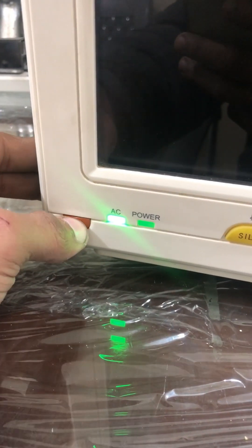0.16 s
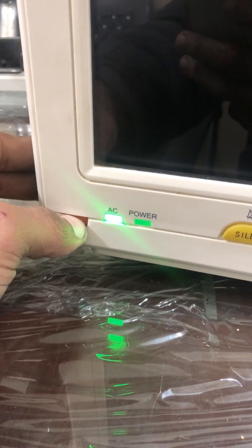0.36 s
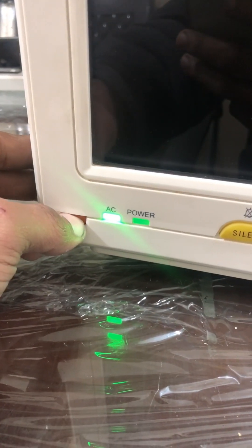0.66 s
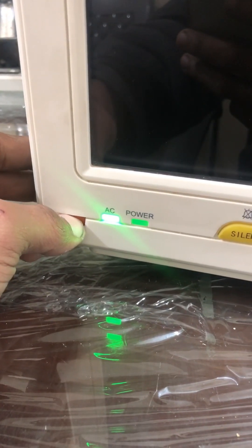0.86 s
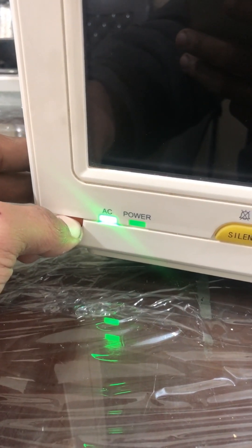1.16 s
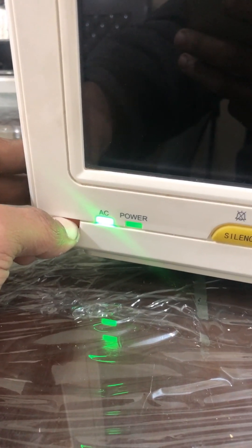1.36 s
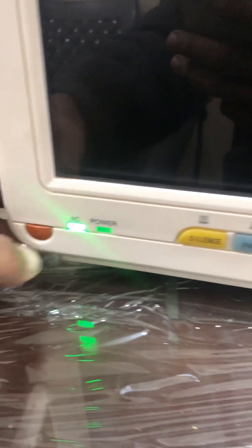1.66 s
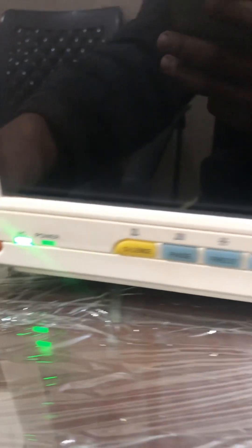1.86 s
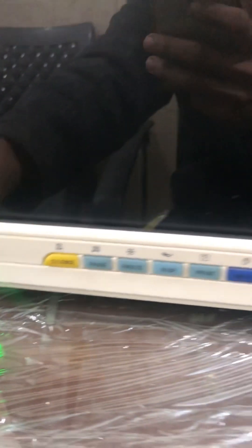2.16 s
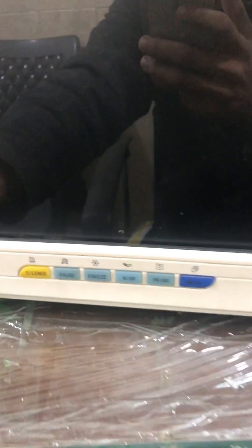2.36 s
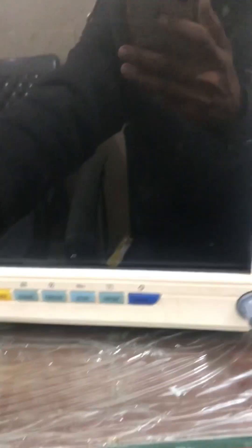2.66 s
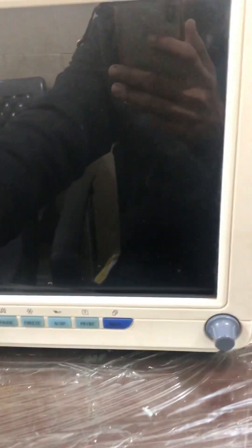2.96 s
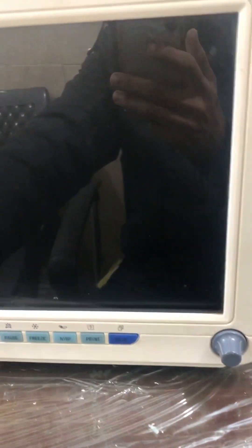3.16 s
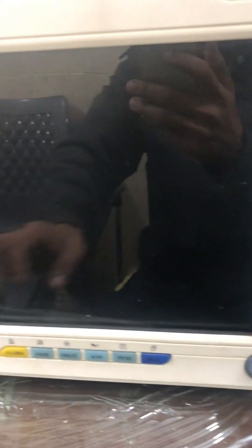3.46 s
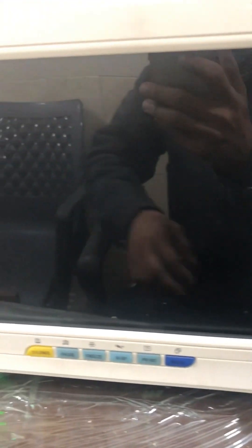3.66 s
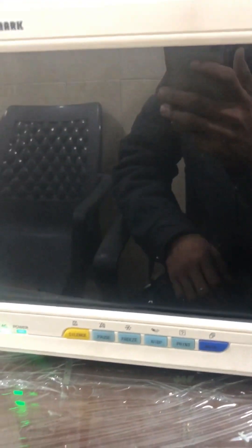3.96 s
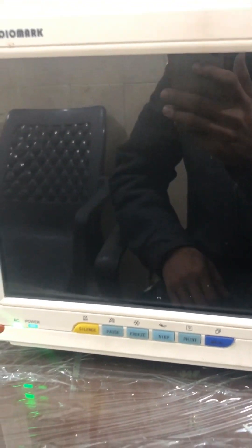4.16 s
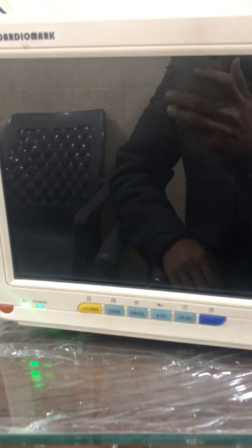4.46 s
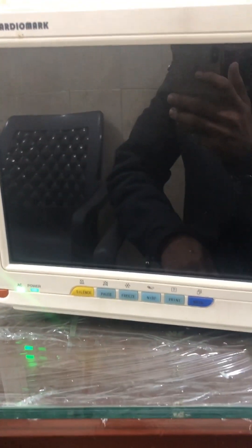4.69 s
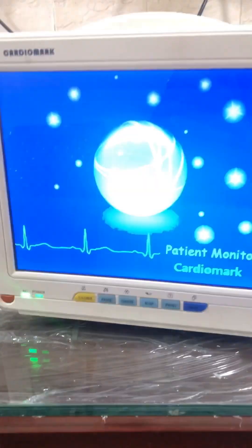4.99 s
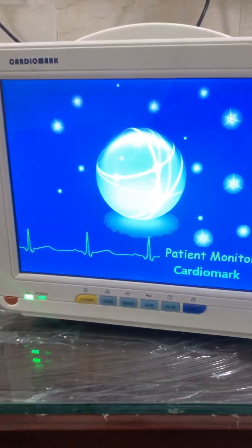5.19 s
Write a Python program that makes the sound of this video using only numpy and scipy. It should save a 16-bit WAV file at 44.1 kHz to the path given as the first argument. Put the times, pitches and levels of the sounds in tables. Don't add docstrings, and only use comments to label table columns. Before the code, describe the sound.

Close handling of a plastic device: clicks, soft rustling, hollow chair knocks, two bright clacks and an arm thudding on a film-covered desk.

```python
import sys
import numpy as np
from scipy import signal
from scipy.fft import rfft, irfft
from scipy.io import wavfile
from scipy.ndimage import uniform_filter1d

SR = 44100
rng = np.random.default_rng(int(sys.argv[2]) if len(sys.argv) > 2 else 0)


def output_pcm(signal):
    pcm = np.clip(np.atleast_2d(signal).T, -1, 1) * 32767
    wavfile.write(sys.argv[1], SR, np.round(pcm).astype(np.int16))


def level_to_linear(level):
    exponent = np.asarray(level, float) / 20
    return 10 ** exponent


N = 235097


def rms_one(x):
    return x / np.sqrt(np.mean(x ** 2) + 1e-20)


def at_hz(points, hz):
    table = np.array(points)
    return np.interp(np.log(hz), np.log(table[:, 0]), table[:, 1])


def add(out, s, sound):
    at = round(s * SR)
    out[at:at + len(sound)] += sound[:N - at]


def drift(rate):
    r = np.exp(-80 * np.pi * rate / SR)
    white = rng.standard_normal(N // 40 + 2002)
    slow = signal.lfilter([1], [1, -2 * r, r * r], white)[2000:]
    return np.interp(np.arange(N) / 40, np.arange(len(slow)), rms_one(slow))


def ring(force, hz, t60):
    r = level_to_linear(-60 / (max(t60, .003) * SR))
    w = 2 * np.pi * hz / SR
    return signal.lfilter([0, np.sin(w)], [1, -2 * r * np.cos(w), r * r], force + 1e-18)


def modes(force, table):
    return sum((-1) ** k * level_to_linear(db) * ring(force, hz, t60) for k, (hz, db, t60) in enumerate(table))


def push(ms, size=22050):
    width = np.arange(size) / SR / (max(ms, .05) / 1000)
    force = np.sin(np.pi * np.minimum(width, 1))
    return force / force.sum()


def swell(force, hz, t60):
    twice = ring(ring(force, hz, t60), hz, t60)
    return twice / np.abs(twice).max()


def coloured(spectrum, size):
    hz = np.maximum(np.fft.rfftfreq(size, 1 / SR), 1)
    outside = (hz < spectrum[0][0]) | (hz > spectrum[-1][0])
    gain = level_to_linear(at_hz(spectrum, hz) - 30 * outside)
    return rms_one(irfft(rfft(rng.standard_normal(size)) * gain, size))


def burst(spectrum, t60, rise_ms, size=22050):
    t = np.arange(size) / SR
    rise = np.minimum(t * 1000 / max(rise_ms, .05), 1)
    return coloured(spectrum, size) * level_to_linear(-60 * t / max(t60, .003)) * rise


def bells(still_db, s, half_s, peak_db):
    t = np.arange(0, N + 64, 64) / SR
    away = (t - s[:, None]) / np.maximum(half_s, .01)[:, None]
    swells = level_to_linear(peak_db[:, None] - 6 * away ** 2)
    power = level_to_linear(still_db) ** 2 + np.sum(swells ** 2, axis=0)
    return np.interp(np.arange(N) / 64, np.arange(len(power)), 10 * np.log10(power))


def radiate(x, low_hz):
    return signal.sosfilt(signal.butter(2, low_hz, "high", fs=SR, output="sos"), x)


# (f/Hz, t60/s)
ROOM_T60 = [(100, 1), (500, 0.33), (2000, 0.42), (6000, 0.32), (12000, 0.24)]


def room(x, size=32768):
    t = np.arange(size) / SR
    tail = 0
    edges = 80 * 2 ** np.arange(0, 8.1, .5)
    for low, high in zip(edges, edges[1:]):
        half_octave = signal.butter(2, [low, high], "band", fs=SR, output="sos")
        band = signal.sosfilt(half_octave, rng.standard_normal(size))
        tail = tail + band * level_to_linear(-60 * t / at_hz(ROOM_T60, np.sqrt(low * high)))
    tail = tail * np.clip((t - .003) / 0.00067, 0, 1)
    return signal.fftconvolve(x, tail / np.sqrt(np.sum(tail ** 2)))[:N]


# (f/Hz, level/dB per Hz)
RUMBLE_SHAPE = [(15, -32), (25, -43), (39, -19), (54, -12), (70, 4.5), (86, -6), (118, -1.5), (145, -7),
                (166, -6.5), (220, -2), (290, -38), (480, -120)]
# (f/Hz, level/dB re rumble, t60/s)
HUM = [(60, -3, .5), (119, -4, .4)]
RUMBLE_DB, RUMBLE_WANDER_DB = -65, 3.5


def rumble():
    level_db = RUMBLE_DB + RUMBLE_WANDER_DB * drift(7.5)
    white = rng.standard_normal(N)
    hum = sum(level_to_linear(db) * rms_one(ring(white, hz, t60)) for hz, db, t60 in HUM)
    return level_to_linear(level_db - 7) * (level_to_linear(-2.0) * coloured(RUMBLE_SHAPE, N) + hum)


# (t/s, half length/s, level/dB)
BOOMS = [
    (0.958, 0.08, -65.5),
    (1.615, 0.038, -59),
    (2.067, 0.054, -64),
    (2.395, 0.03, -73),
    (2.765, 0.053, -70),
    (3.795, 0.061, -49.5),
    (3.985, 0.077, -54),
    (4.212, 0.12, -72),
    (5.19, 0.048, -61),
]
# (f/Hz, level/dB per Hz)
BOOM_SHAPE = [(60, -12), (95, -5.5), (118, -3), (200, -10.5), (290, -22)]


def booms():
    return level_to_linear(bells(-86, *np.transpose(BOOMS))) * coloured(BOOM_SHAPE, N)


# (t/s of fastest motion, half length/s, swish level/dB, weight/dB, speed/dB)
STROKES = [(0.055, 0.069, -70, -0.5, -9.5), (1.662, 0.21, -77.5, 6.5, -6), (2.066, 0.29, -70.5, 4.5, -3),
           (2.415, 0.15, -70.5, 6, -2.5), (2.566, 0.083, -52, -6, -10), (2.77, 0.049, -61.5, 5.5, -9),
           (3.033, 0.37, -71.5, 4, -5.5), (3.375, 0.047, -72.5, -10, 6), (3.442, 0.19, -65, 4.5, -4),
           (3.657, 0.28, -66, 1.5, -19), (3.87, 0.14, -57.5, 0.5, -2), (4.13, 0.11, -58.5, -6, -1),
           (4.37, 0.26, -67, 9, 0), (4.62, 0.1, -64, 6, -7.5), (4.756, .08, -78, 12, -38.5),
           (4.98, 0.21, -68, 6, 0), (5.272, 0.21, -70.5, -1, -20)]
STILL_DRAG_DB, STILL_SWISH_DB, STILL_SHEEN_DB = -72, -79.5, -79


def motion():
    s, half_s, db, weight_db, speed_db = np.transpose(STROKES)
    return (bells(STILL_DRAG_DB, s, half_s, db + weight_db),
            bells(STILL_SWISH_DB, s, half_s, db),
            bells(STILL_SHEEN_DB, s, half_s, db + speed_db))


# (f/Hz, level/dB per Hz)
DRAG = [(120, -6.5), (200, 0.5), (400, 2.5), (800, -2), (1500, -9), (2500, -20.5)]
SWISH = [(800, -4), (1500, -1.5), (2500, 1), (4000, 0.5), (6000, -7), (9000, -24)]
SHEEN = [(3500, -3.5), (6000, 3.5), (9000, 2.5), (12000, 0.5), (14800, -3.5), (15500, -5), (15850, -40)]


def rustle(patchy_db):
    together = drift(22.6)
    out = np.zeros(N)
    for level_db, shape in zip(motion(), (DRAG, SWISH, SHEEN)):
        flicker_db = patchy_db * (together + 1.2 * drift(37))
        out += level_to_linear(level_db + flicker_db) * coloured(shape, N)
    return out


SNAP_FROM_DB, SNAPS_PER_S_PER_DB, SNAPS_MAX_PER_S = -70.5, 34.5, 260
SNAP_DB, SNAP_FOLLOWS = -62.5, 0.16


def crackle():
    swish_db = motion()[1]
    per_s = np.minimum(SNAPS_PER_S_PER_DB * (swish_db - SNAP_FROM_DB), SNAPS_MAX_PER_S)
    level_db = SNAP_DB + SNAP_FOLLOWS * (swish_db - SNAP_DB)
    size_db = 4.5 * np.minimum(rng.exponential(1, N), 3)
    snaps = (rng.random(N) < per_s / SR) * level_to_linear(size_db) * rng.choice([-1, 1], N)
    film = [(1130, -3.0, 0.009), (1770, -6.5, 0.0061), (3280, -10.0, 0.019), (5070, -22.5, 0.0038)]
    return level_to_linear(level_db) * modes(snaps, film)


# (t/s, level/dB)
CREASES = [
    (2.415, -50),
    (2.444, -55),
    (2.48, -49.5),
    (2.498, -49),
]
CREASE_FROM_HZ, CREASE_TO_HZ, CREASE_S = 2900, 485, 0.00653


def creases():
    out = np.zeros(N)
    part = np.linspace(0, 1, round(CREASE_S * SR))
    hz = CREASE_FROM_HZ * (CREASE_TO_HZ / CREASE_FROM_HZ) ** part
    chirp = np.sqrt(np.sin(np.pi * part) + 1e-12) * np.sin(2 * np.pi * np.cumsum(hz) / SR)
    for s, level_db in CREASES:
        add(out, s, level_to_linear(level_db) * chirp)
    return out


# (t/s, length/s, start f/Hz, end f/Hz, level/dB)
SQUEAKS = [
    (4.14, .075, 13300, 13950, -71),
    (4.215, .07, 13550, 13750, -73),
    (4.29, .04, 12150, 12000, -73),
    (4.34, .04, 14100, 13450, -70),
    (4.365, .03, 15300, 15400, -73),
    (4.41, .06, 12050, 12250, -71),
    (4.44, .035, 13950, 13600, -72),
    (4.48, .025, 14600, 14700, -74),
]


def squeaks():
    out = np.zeros(N)
    for s, length, start_hz, end_hz, level_db in SQUEAKS:
        size = round(length * SR)
        waver = 1500 * uniform_filter1d(rng.standard_normal(size), size=200)
        phase = 2 * np.pi * np.cumsum(np.linspace(start_hz, end_hz, size) + waver) / SR
        add(out, s, level_to_linear(level_db + 2.5) * np.sqrt(np.hanning(size)) * np.sin(phase))
    return out


# (f/Hz, level/dB, t60/s)
DRAGGED = [(4690, -1, .022), (5480, -4, .012), (5800, -5, .012), (8000, -4, .012), (9800, -4, .01),
           (10800, -5, .01), (11900, -5, .01), (13600, -6, .01), (14300, -7, .01)]
SLIDE_S, SLIDE_ATTACK_S, SLIDE_DB, SLIDE_STUTTER_DB = 4.8, 0.049, -71.5, -0.5


def slide():
    moving = np.clip((np.arange(N) / SR - SLIDE_S) / SLIDE_ATTACK_S, 0, 1)
    singing = rms_one(modes(rng.standard_normal(N), DRAGGED))
    return moving * singing * level_to_linear(SLIDE_DB + SLIDE_STUTTER_DB * drift(22.0))


# (t/s, peak level/dB, f/Hz, edge level/dB re peak, t60/s)
KNOCKS = [
    (2.026, -34, 415, -18, 0.026),
    (2.043, -56.5, 453, 0.5, 0.05),
    (2.087, -29.5, 434, -24, 0.034),
    (2.144, -45.5, 415, -22, 0.041),
    (4.601, -40.5, 414, -34, 0.032),
    (4.643, -50, 483, -10, 0.024),
    (4.71, -54.5, 343, -8.5, 0.017),
    (4.736, -49.5, 258, -13, 0.06),
]


def knocks():
    out = np.zeros(N)
    for s, peak_db, hz, edge_db, t60 in KNOCKS:
        air = .8 * swell(push(.6), hz, t60)
        wall = [(.88 * hz, -14, .12), (1.14 * hz, -12, .12), (.47 * hz, -16, .1), (2.2 * hz, -14, .05)]
        walls = modes(push(2.4), wall)
        blur = [(170, 3.5), (330, -7.5), (430, -2.5), (560, -1), (800, -70)]
        rough = level_to_linear(-12.0) * burst(blur, 0.25, rise_ms=17.0)
        edge = level_to_linear(edge_db - 0.5) * burst([(600, 15.0), (2500, 0.5), (5000, -18)], 0.23, rise_ms=2.9)
        add(out, s - .001, level_to_linear(peak_db) * (air + walls + rough + edge))
    return out


# (t/s, f/Hz, level/dB, t60/s)
PINGS = [
    (1.586, 2215, -48, .13),
    (3.706, 5090, -37, .035),
    (3.706, 5140, -53, .35),
    (3.706, 7400, -45, .055),
    (3.706, 9550, -43, .07),
    (3.706, 11500, -42, .04),
    (3.93, 2150, -55, .08),
]


def spring():
    out = np.zeros(N)
    for s, hz, level_db, t60 in PINGS:
        add(out, s, level_to_linear(level_db) * ring(push(.1), hz, t60))
    return out


# (t/s, peak level/dB, rattle t60/s, body level/dB re peak, buzz level/dB re peak)
CLACKS = [
    (2.7303, -20.5, 0.035, -15.5, -21.5),
    (5.1508, -22.5, 0.069, -11, -17.5),
]
# (f/Hz, level/dB, t60/s)
BODY = [(275, -12, .2), (460, -20, .15), (640, -11, .09), (730, -12, .08), (856, -3, .105), (1125, -9, .14),
        (1950, -18, .12)]
SHELL = [(3400, -14, .15), (4690, -7, .12), (5250, -7, .1), (5462, -2, .16), (5660, -7, .14),
         (5840, -5, .12), (8750, -12, .1), (9900, -8, .1), (10420, -6, .12), (10800, -6, .12),
         (11265, -3, .14), (11960, -5, .13), (12480, -7, .12), (13275, -10, .12)]
# (f/Hz, level/dB per Hz)
CRACK = [(710, -36), (1200, 3.5), (1370, -10), (1880, -3.5), (2970, -17.5), (3320, -6), (4410, -9),
         (4810, 0), (7290, -16.5), (8500, -6), (11700, -1), (14800, -14), (16400, -33)]
SECOND_CRACK = [(710, -14), (1200, -1.5), (1410, -12), (1800, -10), (1920, -3.5), (3070, -17), (3350, -8.5),
                (4920, -4.5), (5610, 2.5), (7370, -15.5), (11200, 1), (15000, -17), (16400, -36)]
CLACK_EDGE_T60_S, SHELL_DB = .022, -44.5


def clacks():
    out = np.zeros(N)
    for (s, peak_db, rattle_t60, body_db, buzz_db), colour in zip(CLACKS, (CRACK, SECOND_CRACK)):
        rattle = burst([(300, 0), (18000, 0)], rattle_t60, rise_ms=0.48)
        crack = level_to_linear(-10) * burst(colour, rattle_t60, rise_ms=1.2)
        crack += level_to_linear(-5) * burst(colour, CLACK_EDGE_T60_S, rise_ms=1.4)
        second = level_to_linear(-5) * burst(colour, CLACK_EDGE_T60_S, rise_ms=.5, size=4096)
        add(crack, .0028, second)
        buzz = level_to_linear(buzz_db) * burst(colour, 0.29, rise_ms=1.0)
        add(out, s - .0006, level_to_linear(peak_db) * (crack + buzz + level_to_linear(SHELL_DB) * modes(rattle, SHELL)))
        add(out, s + 0.00362, level_to_linear(peak_db + body_db) * modes(push(0.17), BODY))
    return out


# (f/Hz, level/dB per Hz)
TICK = [(900, 11), (1500, 6.5), (3000, 13.5), (6000, 8), (10000, -2.5), (14000, -5), (16400, -41)]
SOFT_TICK_HZ, HARD_TICK_HZ, HARD_DB = 2370, 5730, -29
RIB_HZ, RIB_T60_S, RIB_DB = 1520, 0.018, -1


def contacts(events, desk, blur, thump_ms, tick_t60, cycles, blur_db, blur_t60, rib_from_db):
    out = np.zeros(N)
    for s, peak_db, panel_hz, tick_db, thump_db in events:
        tick_hz = HARD_TICK_HZ if peak_db > HARD_DB else SOFT_TICK_HZ
        scratch = burst(TICK, tick_t60, rise_ms=0.36)
        scuff = 0.58 * burst(TICK, 3.0 * tick_t60, rise_ms=0.44)
        cap = 0.091 * ring(scratch, tick_hz, 14 / tick_hz)
        tick = level_to_linear(tick_db - 1.0) * (scratch + scuff + cap)
        panel = .7 * swell(push(.3), panel_hz, 11 / panel_hz)
        panel -= cycles / 40 * ring(push(1.0), 1.575 * panel_hz, cycles / (0.62 * panel_hz))
        panel += 0.27 * ring(push(0.15), 2.07 * panel_hz, 6.8 / (3.1 * panel_hz))
        if peak_db > rib_from_db:
            panel += level_to_linear(RIB_DB) * ring(push(0.28), RIB_HZ, RIB_T60_S)
        minor = burst(blur, blur_t60, rise_ms=1.0) + 1.9 * burst(blur, 0.31 * blur_t60, rise_ms=0.18)
        add(out, s + .001, level_to_linear(peak_db) * (tick + panel + level_to_linear(blur_db) * minor))
        add(out, s + 0.00416, level_to_linear(peak_db + thump_db - 2.5) * modes(push(thump_ms), desk))
    return out


# (t/s, peak level/dB, panel f/Hz, tick level/dB re peak, thump level/dB re peak)
LANDINGS = [(2.438, -52.5, 460, -10, -27), (2.496, -59, 885, -13, -18), (2.547, -33, 560, -16, -24.5),
            (3.672, -55, 850, -21, -21), (3.692, -35, 1730, -14, -12.5), (3.697, -37, 1360, -20, -20),
            (3.705, -28.5, 608, -6.5, -23.5), (3.708, -34, 940, -27, -28), (3.927, -44.5, 950, -6, -6),
            (4.39, -57, 387, -29, 1.5), (4.88, -61.5, 400, -30, 2)]
# (f/Hz, level/dB, t60/s)
ARM_DESK = [(119.5, -8, 0.21), (192.7, -2.5, 0.57), (243.3, 3.5, 0.47), (293, 3, 0.24), (428, -59, 0.1),
            (670, 0.5, 0.055), (940, -5, .1)]
# (f/Hz, level/dB per Hz)
ARM_BLUR = [(100, -34), (250, -13), (450, 10), (1000, 0), (1800, -6), (4000, -15)]


def arm_landings():
    return contacts(LANDINGS, ARM_DESK, ARM_BLUR, thump_ms=2.42, tick_t60=0.015, cycles=18.0,
                    blur_db=-16, blur_t60=0.42, rib_from_db=0)


# (f/Hz, level/dB per Hz)
SLIP = [(5000, -14), (8500, -2), (10500, -2), (13000, 0), (15500, -6)]
SLIP_S, SLIP_DB = 1.567, -59
REBOUND_S, REBOUND_DB, REBOUND_T60_S = 1.589, -41.5, 0.012


def thumb_slip():
    out = np.zeros(N)
    size = round((REBOUND_S - SLIP_S) * SR)
    add(out, SLIP_S, level_to_linear(SLIP_DB) * np.linspace(.3, 1, size) * coloured(SLIP, size))
    add(out, REBOUND_S, level_to_linear(REBOUND_DB) * burst(SLIP, REBOUND_T60_S, rise_ms=.4, size=2048))
    return out


# (t/s, peak level/dB, panel f/Hz, tick level/dB re peak, thump level/dB re peak)
PRESSES = [(0.218, -45.5, 428, -2.5, -7), (0.26, -44.5, 834, -16, -34), (0.275, -30.5, 595, -21, -11),
           (0.344, -56, 384, -33, 0.5), (0.469, -36, 818, -11.5, -16.5), (0.732, -60, 1095, -1, -4),
           (1.423, -49.5, 736, -15.5, -13), (1.53, -62.5, 620, 4, -11), (1.562, -28, 602, -7, -18.5),
           (1.565, -34, 1060, -23, -27), (1.589, -38.5, 516, -1.5, -5.5), (1.69, -48.5, 1300, -1, -31),
           (1.703, -51, 800, -25.5, -33)]
# (f/Hz, level/dB, t60/s)
DESK = [(234, 4, 0.088), (279, 5.5, 0.16), (395, 18.5, 0.016), (616, 10, 0.14), (600, -13, 0.22),
        (756, -32, .1)]
# (f/Hz, level/dB per Hz)
CASE_BLUR = [(150, 1), (250, 0.5), (450, 8.5), (900, 5.5), (1600, -6.5), (3000, -36.5)]


def button_presses():
    return contacts(PRESSES, DESK, CASE_BLUR, thump_ms=2.1, tick_t60=.014, cycles=6.6,
                    blur_db=-10.5, blur_t60=0.091, rib_from_db=HARD_DB)


def scene():
    near = radiate(button_presses(), low_hz=203)
    arm = radiate(arm_landings(), low_hz=105)
    hollow = radiate(knocks(), low_hz=201)
    hard = radiate(clacks(), low_hz=216)
    wet = level_to_linear(-13) * near + level_to_linear(-8) * arm + level_to_linear(-10.0) * hollow + level_to_linear(-8.0) * hard
    beds = rumble() + booms() + rustle(patchy_db=0.6) + crackle() + creases()
    beds += squeaks() + slide() + thumb_slip()
    return (near + arm + hollow + hard + spring() + room(wet) + beds)[None]


def roll_off(x):
    return signal.sosfilt(signal.butter(12, 16530, fs=SR, output="sos"), x)


def record(dry):
    heard = signal.sosfilt(signal.butter(2, 45, "high", fs=SR, output="sos"), dry)
    return roll_off(heard)


dry = scene()
out = record(dry)
output_pcm(out)
```